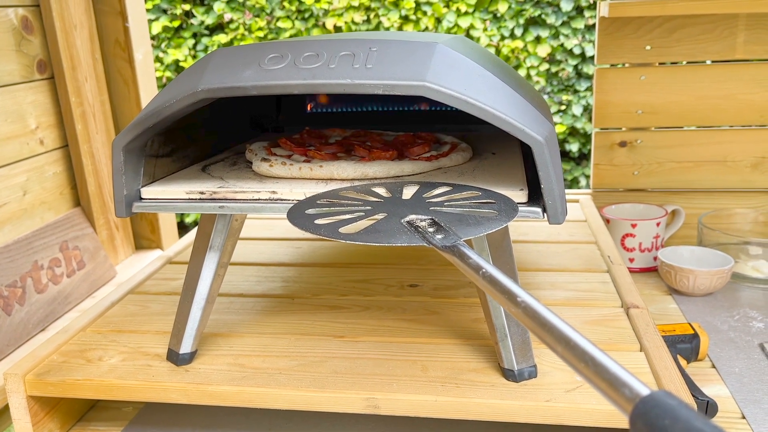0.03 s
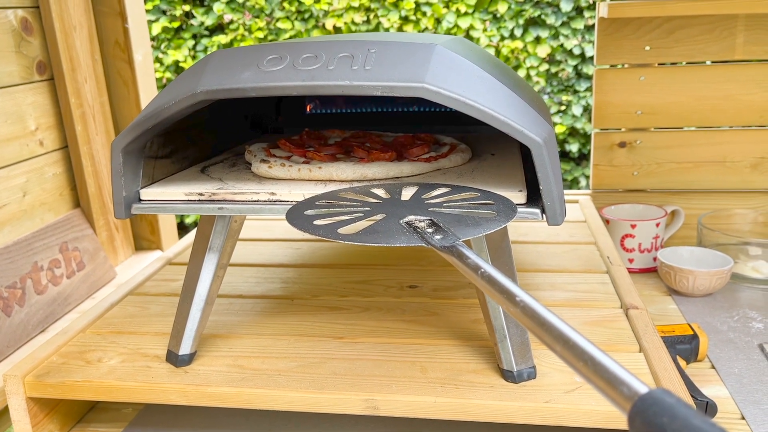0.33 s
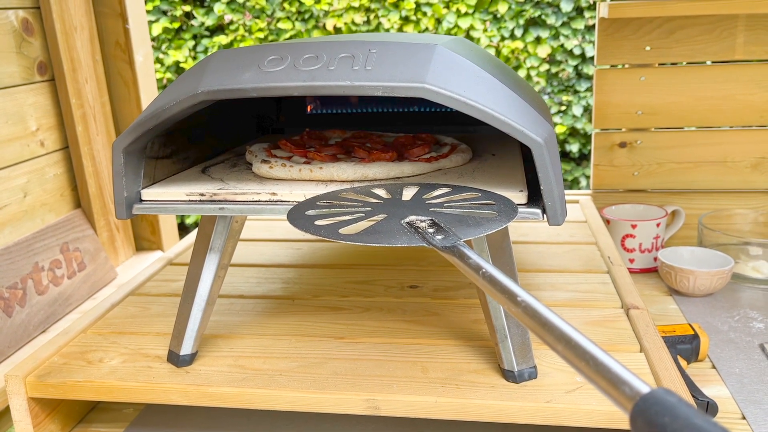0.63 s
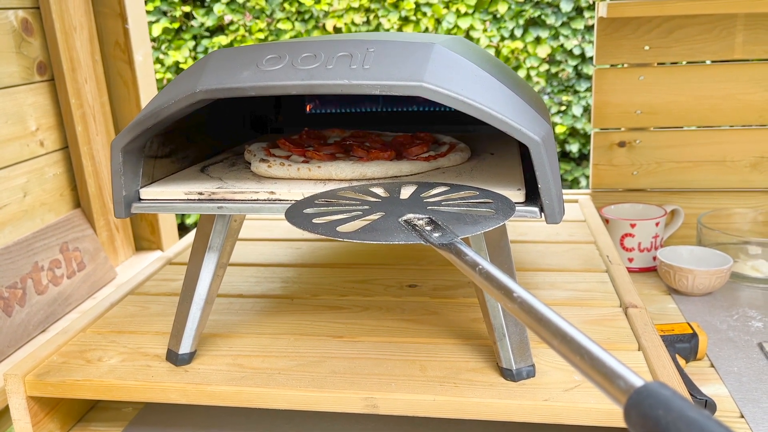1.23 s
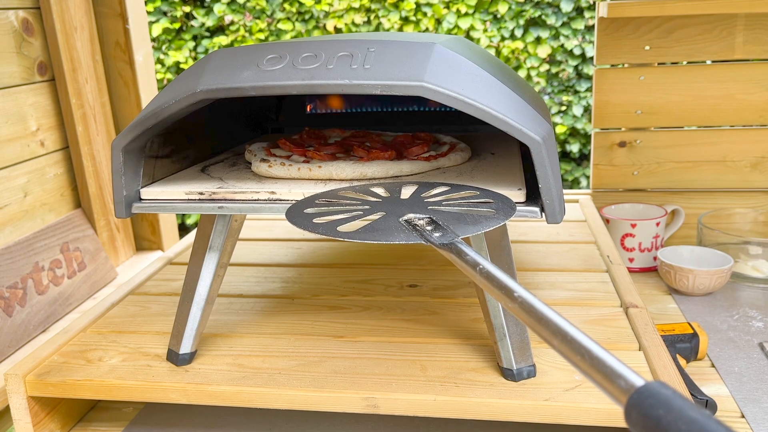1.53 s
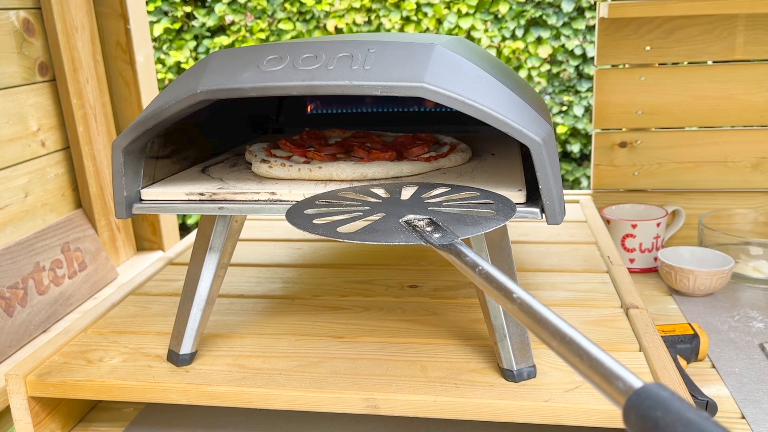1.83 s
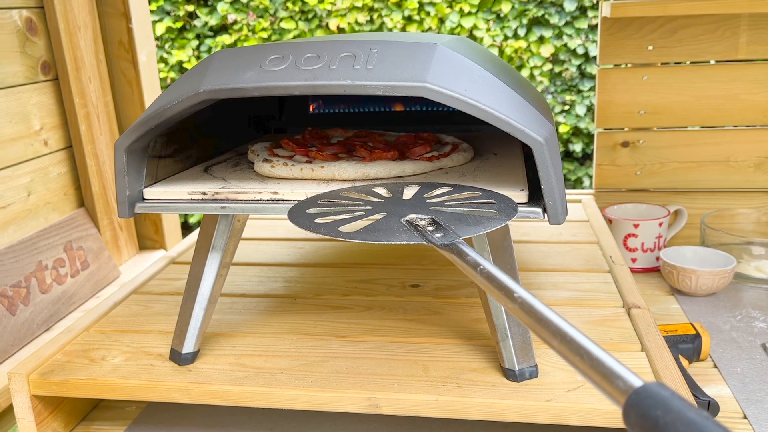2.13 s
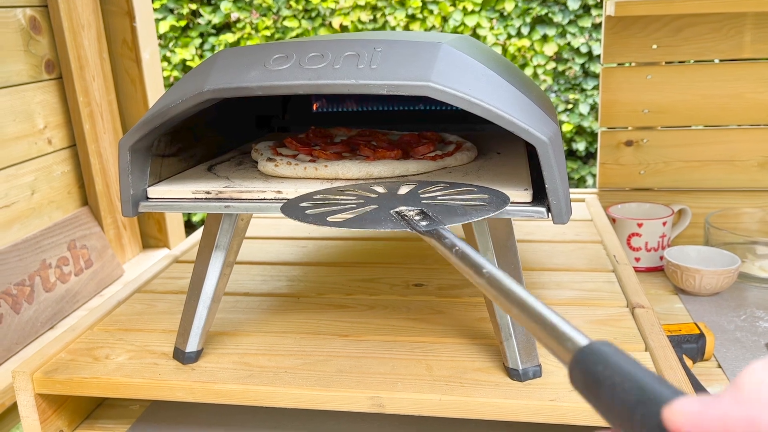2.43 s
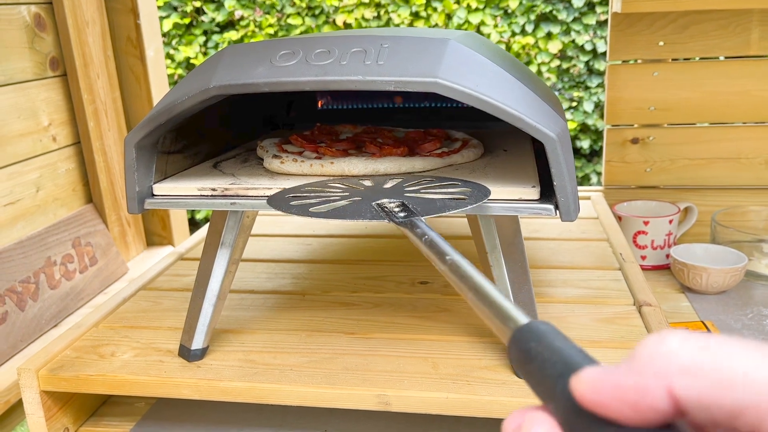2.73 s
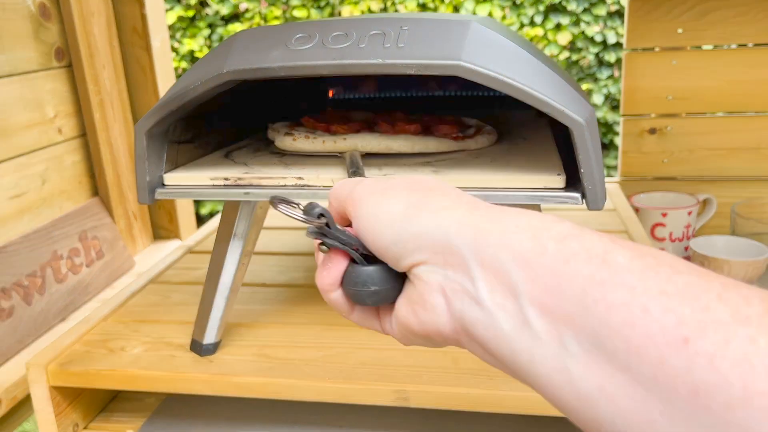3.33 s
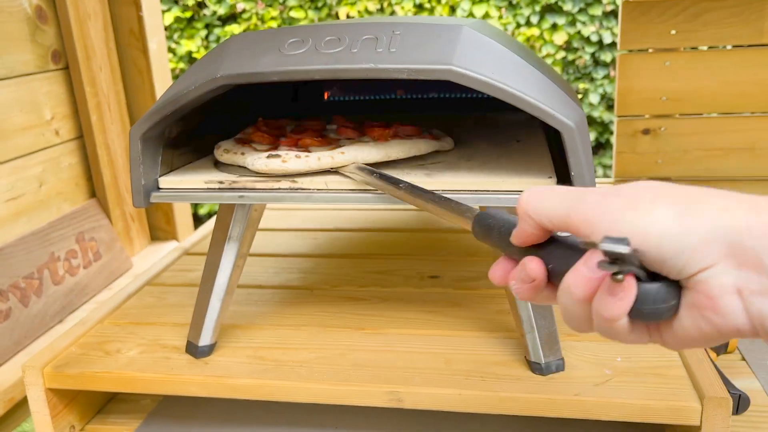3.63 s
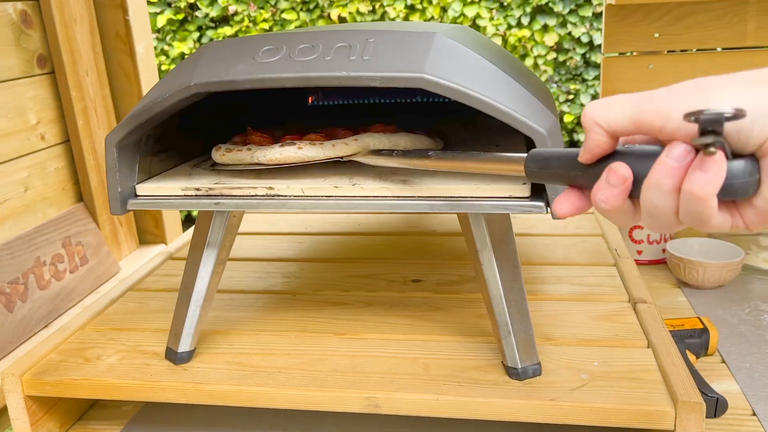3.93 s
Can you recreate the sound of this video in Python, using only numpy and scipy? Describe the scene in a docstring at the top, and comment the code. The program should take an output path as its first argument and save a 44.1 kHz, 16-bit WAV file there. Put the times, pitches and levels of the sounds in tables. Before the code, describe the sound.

A metal peel scrapes under a pizza and twists it, over a low gas burner rumble.

```python
"""Outdoors, close to the mouth of a gas pizza oven, on a mid-side microphone pair. The burner rumbles
throughout and the hot oven spits faintly. At 2.4 s a metal peel is picked up with a click, just left
of centre; it glides over the oven's lip, scrapes across the gritty stone and, at 3.25 s, knocks home
under the pizza. It is then twisted round with a ringing, juddering drag, and at 3.8 s the pizza flops
back on the stone."""
import sys
import numpy as np
from scipy import signal
from scipy.fft import rfft, irfft
from scipy.io import wavfile

SR = 44100
rng = np.random.default_rng(int(sys.argv[2]) if len(sys.argv) > 2 else 0)


def wav_out(sig):
    """Save sig, one row per channel (or a flat mono array), as 16-bit PCM at SR to the path in sys.argv[1]."""
    wavfile.write(sys.argv[1], SR, np.round(np.clip(np.atleast_2d(sig).T, -1, 1) * 32767).astype(np.int16))


N = 176400  # 4 s


# modes of the loaded peel and oven (frequency [Hz], t60 [s], knocked level [dB], dragged level [dB])
LOADED_MODES = [(326, 0.3, -14.5, -26), (380.4, 0.38, -16.5, -5), (441.5, 0.11, 6.5, 10),
                (539.6, .13, -7, -27), (626, 0.21, -19, -4.5), (784, 0.092, -8.5, -28),
                (832, 0.12, -10, -4), (1010, .1, -13, -18), (1144, 0.12, -12.5, 1.5),
                (1418, 0.44, -39, 3.5), (1575, 0.11, -11.5, -26), (1900, 0.28, -24.5, -7.5),
                (2540, 0.48, -25, -20), (2734, 0.084, -31, -23), (3063, 0.056, -30, -2.5),
                (3835, 0.047, -33, -4), (4010, 0.15, -19, -4.5), (4090, 0.081, -12, -26),
                (4990, 0.051, -39, -8), (4880, 0.29, -24, -26), (9297, 0.18, -31, -22)]
# friction of the twisting blade (frequency [Hz], gain [dB])
DRAG_COLOUR = [(100, -51), (280, -12.5), (420, 5), (540, 1), (1000, 4.5), (1500, -1.5), (2100, -8.5),
               (2700, 0), (3400, -14), (4000, -21.5), (4500, -20.5), (5100, -8.5), (6200, -53), (7400, -14),
               (10000, -48), (15000, -34)]
# course of the twist (time [s], body level [dB], treble level [dB])
DRAG_LEVEL = [(3.38, -39.5, -70), (3.41, -44, -51), (3.47, -52, -52), (3.5, -49.5, -46), (3.56, -39, -45.5),
              (3.62, -29.5, -32.5), (3.67, -28, -29), (3.688, -22.5, -24), (3.718, -21.5, -23),
              (3.746, -30.5, -30), (3.757, -30, -22.5), (3.78, -34.5, -29), (3.806, -40, -43),
              (3.816, -27.5, -29.5), (3.87, -55, -55), (3.95, -49, -55), (4.0, -70, -55)]

def drag(ring_db=-1, treble_db=-1, split_hz=1800):
    """Inside the oven, the loaded blade sticks and slips as it twists, ringing its modes."""
    slips = grit(per_s=4000, spread_db=1.5, clump_db=1.44, clump_hz=160)
    friction = unit(oven_mouth(colour(slips, DRAG_COLOUR), wet_db=2.5, t60=0.1))
    modes = [(hz, t60, dragged_db) for hz, t60, _, dragged_db in LOADED_MODES]
    judder = friction + amp(ring_db) * ring(slips, modes)
    body = signal.sosfiltfilt(signal.butter(4, split_hz, fs=SR, output="sos"), judder)
    times, body_level, treble_level = np.transpose(DRAG_LEVEL)
    treble = unit(judder - body) * envelope(times, treble_level + treble_db)
    return unit(body) * envelope(times, body_level) + treble


# the blade striking stone and oven (time [s], crack level [dB], ring level [dB])
KNOCKS = [(3.2475, 3, -10), (3.2641, -29, -33), (3.292, -16, -57), (3.479, -29.5, -49), (3.754, -19, -27.5),
          (3.812, -19, -33.5), (3.859, -22, -48), (3.9702, -20.5, -52)]
# spectrum of the crack (frequency [Hz], gain [dB])
CRACK_COLOUR = [(100, -15.5), (350, -1.5), (620, 2.5), (850, 0), (1300, 0), (2000, -3.5), (2900, 2.5),
                (3500, -8), (4100, 3.5), (4600, -12), (5300, -1), (6500, -26), (15000, -28)]

def knocks(ring_rise_s=0.0023, ring_lag_s=0.0012, width=0.7, side_phase_rad=0.97, dull_hz=2500):
    """Each knock is a rattling crack, a duller echo from the oven and the ring of the loaded peel."""
    hits = bursts([row[:2] for row in KNOCKS], decay_s=0.0043, rise_s=0.0015)
    cracks = colour(hits, CRACK_COLOUR)
    echo = oven_mouth(cracks, wet_db=1.5, t60=0.25) - cracks
    out = cracks + signal.sosfilt(signal.butter(1, dull_hz, fs=SR, output="sos"), echo)
    t = np.arange(SR // 2) / SR
    modes = 0
    for hz, t60, knocked_db, _ in LOADED_MODES:
        phase = 2 * np.pi * hz * t + (hz / LOADED_MODES[0][0]) ** 2
        modes += amp(knocked_db) * np.exp(1j * phase) * decay(t, t60)
    side = width * np.exp(1j * side_phase_rad) * modes
    ringing = np.array([modes, side]).imag * (1 - np.exp(-t / ring_rise_s))
    for s, _, ring_db in KNOCKS:
        add(out, s + ring_lag_s, amp(ring_db) * ringing)
    return out


# modes of the blade flat on the stone (frequency [Hz], t60 [s], level [dB])
STONE_MODES = [(300, 0.36, 7.5), (486, 0.09, 1.5), (807, 0.076, 4), (1563, 0.12, 2.5), (3940, 0.06, 4),
               (6370, 0.02, 0.5), (9240, 0.06, 3.5), (11200, 0.036, -4)]
# hiss of the grit (frequency [Hz], gain [dB])
STONE_COLOUR = [(120, -22), (300, -7), (480, -1.5), (590, -12.5), (800, 0), (1300, -2.5), (1800, -4.5),
                (2500, 3), (3300, 1.5), (4500, 1.5), (5800, -0.5), (6600, -3.5), (9000, 3.5), (11500, -3.5),
                (14000, -4), (16000, -5)]
# course of the scrape (time [s], level [dB])
STONE_LEVEL = [(2.84, -55.5), (2.906, -48), (2.948, -37), (3.026, -29.5), (3.032, -29), (3.084, -32),
               (3.204, -28.5), (3.24, -29), (3.246, -29), (3.408, -55), (3.476, -53.5), (3.478, -50.5),
               (3.57, -51.5), (3.718, -42), (3.792, -39), (3.922, -51), (4.0, -37.5)]
# the blade's ring relative to the hiss (time [s], level [dB])
STONE_CONTACT = [(2.9, -13), (3.05, -16.5), (3.2, -7.5), (3.4, -2), (3.7, -6)]

def scrape():
    """Grit on the oven's stone hisses under the blade, which rings more as it presses down."""
    slips = grit(per_s=9000, spread_db=1, clump_db=1.3, clump_hz=88)
    contact = amp(np.interp(np.arange(N) / SR, *np.transpose(STONE_CONTACT)))
    hiss = unit(oven_mouth(colour(slips, STONE_COLOUR), wet_db=-4.5, t60=0.11))
    scraping = hiss + contact * ring(slips, STONE_MODES)
    return scraping / band(hiss[0], 7800, 14500).std() * envelope(*np.transpose(STONE_LEVEL))


# modes of the free blade on the lip (frequency [Hz], t60 [s], level [dB])
LIP_MODES = [(469, 0.077, -1), (1062, 0.21, 7.5), (2184, 0.11, -2), (2210, 0.13, 5.5), (2600, 0.036, 5.5),
             (3950, .025, 1), (4900, 0.034, -3.5), (5380, 0.016, -2)]
# sizzle of the sliding blade (frequency [Hz], gain [dB])
LIP_COLOUR = [(300, -3), (800, 3), (1800, 4), (3300, 4.5), (6300, -2.5), (9000, 8.5), (11500, 0.5),
              (15500, 1)]
# course of the glide (time [s], level [dB])
LIP_LEVEL = [(2.43, -67), (2.48, -50), (2.525, -55.5), (2.538, -44), (2.63, -49.5), (2.72, -53.5),
             (2.8, -51.5), (2.9, -50), (2.95, -44)]

def glide(ring_db=-1, sizzle_db=1, rock_db=5.0):
    """At the oven's lip, the light blade sings and sizzles as it slides; its ring pulses as it rocks."""
    slips = grit(per_s=3900, spread_db=1.5, clump_db=2, clump_hz=45)
    song = ring(slips * amp(rock_db * wander(rate_hz=8.6)), LIP_MODES)
    sizzle = unit(oven_mouth(colour(slips, LIP_COLOUR), wet_db=4.5, t60=0.097))
    sliding = amp(ring_db) * song + amp(sizzle_db) * sizzle
    return sliding / band(sliding[0], 2130, 5400).std() * envelope(*np.transpose(LIP_LEVEL))


# blade and dough landing (time [s], pitch [Hz], level [dB], t60 [s])
THUDS = [(3.266, 120, -21, 0.095), (3.83, 308, -15.5, 0.028), (3.849, 318, -28.5, 0.16)]

def thuds(rise_s=0.00067):
    """Blade and dough bump on the stone: dull, quickly damped tones in the mid channel."""
    out, t = np.zeros((2, N)), np.arange(SR // 3) / SR
    for s, hz, db, t60 in THUDS:
        bump = amp(db) * np.sin(2 * np.pi * hz * t) * decay(t, t60) * (1 - np.exp(-t / rise_s))
        add(out[:1], s, bump[None])
    return out


# clicks of the handle (time [s], level [dB])
CLICKS = [(2.3735, -33), (2.4014, -18.5), (2.4056, -26), (2.4155, -47)]
# their spectrum (frequency [Hz], gain [dB])
CLICK_COLOUR = [(300, -8), (1200, -21), (2400, -3.5), (3500, -13), (4800, -1.5), (6500, -9.5), (9300, 0),
                (15500, 1.5)]

def handle_clicks():
    """In front of the oven, the handle's fittings click as it is gripped."""
    clicks = colour(bursts(CLICKS, decay_s=0.0022), CLICK_COLOUR)
    return oven_mouth(clicks, wet_db=-2.5, t60=0.076)


# spectrum of flame and gas (frequency [Hz], gain [dB])
BURNER_COLOUR = [(20, -28), (32, -26), (46, 0.5), (58, 0.5), (110, -2), (170, -8), (300, -11.5), (380, -19),
                 (450, -18.5), (540, -26.5), (950, -31.5), (1250, -37.5), (2000, -39), (3000, -41),
                 (3700, -44), (5000, -40), (6600, -51), (8800, -36), (11500, -42.5), (16000, -42.5)]
# the flame's slow swell (time [s], gain [dB])
FLAME_SWELL = [(0, 2), (.6, 1), (1.3, 0), (1.8, 0.5), (2.0, -2), (2.3, 0.5), (2.6, 1.5), (3.1, 2.5), (4, 2)]
# resonances of the gas jet (frequency [Hz], t60 [s], level [dB])
JET_MODES = [(1580, 0.024, 0.5), (2730, 0.009, 4), (4520, 0.05, 1), (4730, 0.025, 5.5), (5840, 0.06, -42.5)]

def burner(level_db=-42, flutter_db=1.02, jet_db=-70, split_hz=700):
    """Behind the peel, the flame rumbles and flutters under the steady hiss of the gas jet."""
    roar = colour(rng.standard_normal((2, N)), BURNER_COLOUR)
    roar /= roar[0].std()
    rumble = signal.sosfiltfilt(signal.butter(2, split_hz, fs=SR, output="sos"), roar)
    hiss = roar - rumble
    flame_gain = envelope(*np.transpose(FLAME_SWELL)) * amp(flutter_db * wander(rate_hz=19))
    jet = ring(rng.standard_normal((2, N)), JET_MODES)
    return amp(level_db) * (hiss + rumble * flame_gain) + amp(jet_db) * jet


# spits from the oven (time [s], level [dB])
SPITS = [(.58, -51), (.6444, -49), (.8629, -50), (.9158, -46.5), (.928, -50), (1.345, -57), (1.4132, -51),
         (1.7255, -52)]
# their spectrum (frequency [Hz], gain [dB])
SPIT_COLOUR = [(300, -18), (1500, 1), (5000, -4), (9000, 7), (15000, 1)]

def oven_spits():
    """The hot oven spits faintly, each tick ringing in its mouth."""
    spits = colour(bursts(SPITS, decay_s=0.0017), SPIT_COLOUR)
    return oven_mouth(spits, wet_db=3.5, t60=0.077)


# faint rustles and soft taps (peak time [s], length [s], band centre [Hz], level [dB])
RUSTLES = [(.11, 0.32, 1200, -63.5), (0.232, 0.017, 2700, -61), (0.72, 0.024, 1100, -62),
           (1.347, 0.015, 980, -58.5), (1.345, 0.01, 3040, -58.5), (2.336, 0.11, 2780, -62),
           (2.372, 0.16, 950, -58)]

def rustles(edge_ratio=1.38):
    """Soft swells of midrange noise in the background."""
    out, t = np.zeros((2, N)), np.arange(N) / SR
    for s, length, hz, db in RUSTLES:
        noise = unit(band(rng.standard_normal((2, N)), hz / edge_ratio, hz * edge_ratio))
        out += amp(db) * noise * np.exp(-(2 * (t - s) / length) ** 2)
    return out


def oven_mouth(x, wet_db, t60):
    """Adds the dense, short ring of the oven's mouth."""
    t = np.arange(SR // 2) / SR
    tail = rng.standard_normal((2, len(t))) * decay(t, t60)
    tail /= np.linalg.norm(tail[0])
    return x + amp(wet_db) * signal.fftconvolve(x, tail, axes=1)[:, :N]


def grit(per_s, spread_db, clump_db, clump_hz):
    """Tiny slips of uneven size that come in clumps; rows are mid and side."""
    slipping = rng.random(N) < per_s / SR
    size = amp(spread_db * np.minimum(rng.exponential(1, N), 4))
    slips = rng.standard_normal((2, N)) * slipping * size
    return unit(slips * amp(clump_db * wander(clump_hz)))


def ring(drive, modes):
    """A running drive rings damped modes (frequency [Hz], t60 [s], level [dB])."""
    t = np.arange(SR // 2) / SR
    response = sum(amp(db) * decay(t, t60) * np.sin(2 * np.pi * hz * t) / np.sqrt(t60)
                   for hz, t60, db in modes)
    return unit(signal.fftconvolve(drive, response[None], axes=1)[:, :N])


def bursts(rows, decay_s, rise_s=0.000074):
    """A brief chatter of contact for each row of (time [s], level [dB])."""
    out, t = np.zeros((2, N)), np.arange(SR // 20) / SR
    shape = np.exp(-t / decay_s) * (1 - np.exp(-t / rise_s))
    for s, db in rows:
        add(out, s, amp(db) * rng.standard_normal((2, len(t))) * shape)
    return out


def colour(x, points, size=8192):
    """Minimum-phase filter through points of (frequency [Hz], gain [dB])."""
    hz, db = np.transpose(points)
    bin_hz = abs(np.fft.fftfreq(size, 1 / SR)) + 1
    log_gain = np.log(amp(np.interp(np.log(bin_hz), np.log(hz), db)))
    taps = np.fft.ifft(np.exp(np.conj(signal.hilbert(log_gain)))).real[:size // 2]
    return signal.fftconvolve(x, taps[None], axes=1)[:, :x.shape[1]]


def band(x, lo_hz, hi_hz):
    """Band-pass filter."""
    return signal.sosfilt(signal.butter(4, [lo_hz, hi_hz], "band", fs=SR, output="sos"), x)


def wander(rate_hz):
    """Slow random curve with an rms of one."""
    rolloff = 1 + (np.fft.rfftfreq(N, 1 / SR) / rate_hz) ** 4
    return unit(irfft(rfft(rng.standard_normal(N)) / rolloff, N))


def envelope(times, db, fade_s=0.06):
    """Gain along a level curve, fading outside it."""
    t = np.arange(N) / SR
    outside_s = abs(t - np.clip(t, times[0], times[-1]))
    return amp(np.interp(t, times, db)) * np.exp(-outside_s / fade_s)


def decay(t, t60):
    """Gain that falls 60 dB in t60 seconds."""
    return amp(-60 * t / t60)


def amp(db):
    """Decibels to gain."""
    return 10 ** (np.asarray(db) / 20)


def unit(x):
    """Scales to an rms of one."""
    return x / np.sqrt(np.mean(x ** 2) + 1e-20)


def add(mix, start_s, sound):
    """Adds a sound into the mix at a time."""
    part = mix[:, round(start_s * SR):][:, :sound.shape[-1]]
    part += sound[:, :part.shape[1]]


# response of the mid microphone (frequency [Hz], gain [dB])
MID_RESPONSE = [(20, -0.5), (11200, 0), (12100, -16), (13100, -24), (14000, 2.5), (16000, 2.5)]
# response of the side microphone (frequency [Hz], gain [dB])
SIDE_RESPONSE = [(60, -15.5), (200, -11), (450, -3), (800, 0), (1500, -1.5), (2100, -17), (2700, -5),
                 (4000, -3), (5000, -7.5), (6400, 7), (7800, 0), (9000, -34), (11000, 2), (13300, 4),
                 (14800, 3), (16000, -21)]

def scene(peel_lean=0.064, burner_lean=0.00046):
    """The pair faces the oven, the peel slightly left of centre; mid and side become left and right."""
    peel = glide() + scrape() + drag() + knocks() + thuds()
    flame = burner()
    at_pair = peel + flame + oven_spits() + handle_clicks() + rustles()
    mid = colour(at_pair[:1], MID_RESPONSE)[0]
    side = colour(at_pair[1:], SIDE_RESPONSE)[0] + peel_lean * peel[0] + burner_lean * flame[0]
    return np.array([mid + side, mid - side])


def record(dry, edge_hz=16000):
    """The recorder clips at full scale, then cuts off the highest treble."""
    lowpass = signal.firwin(511, edge_hz, window=("kaiser", 9), fs=SR)
    return signal.oaconvolve(np.clip(dry, -1, 1), lowpass[None], "same")


dry = scene()
out = record(dry)
wav_out(out)
```